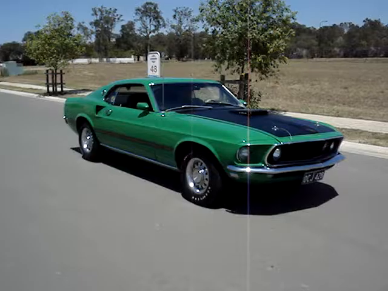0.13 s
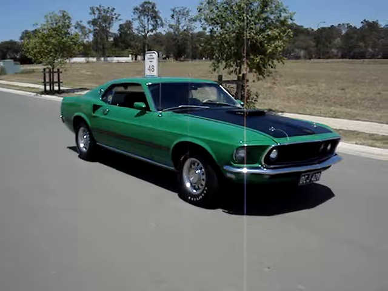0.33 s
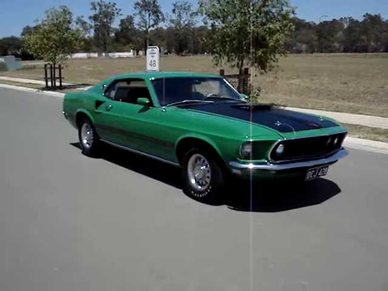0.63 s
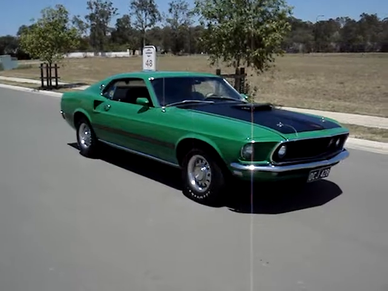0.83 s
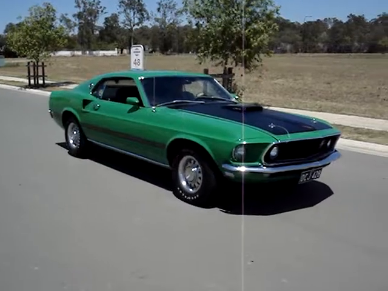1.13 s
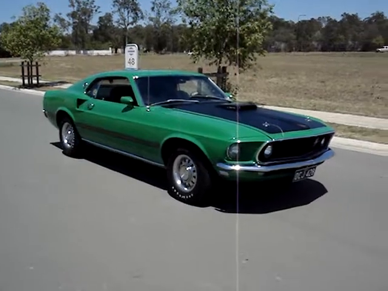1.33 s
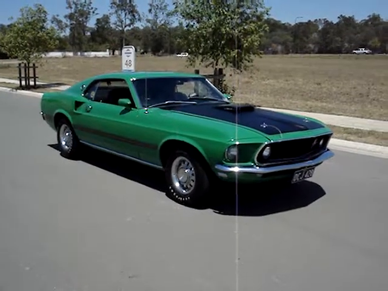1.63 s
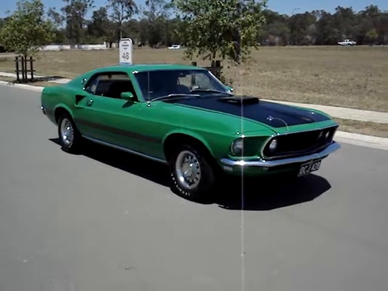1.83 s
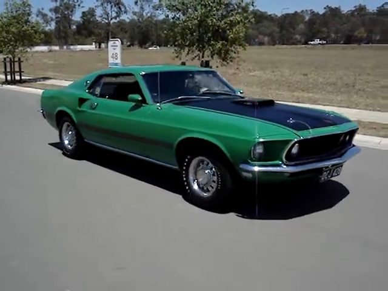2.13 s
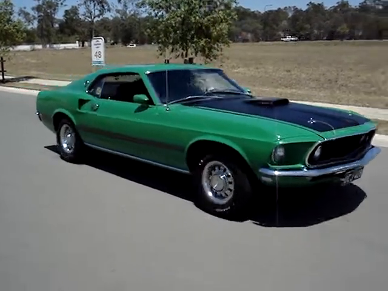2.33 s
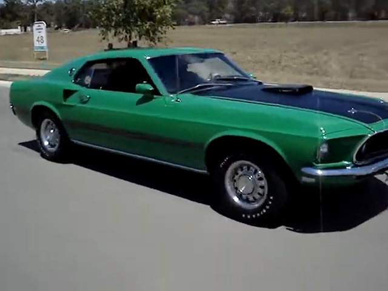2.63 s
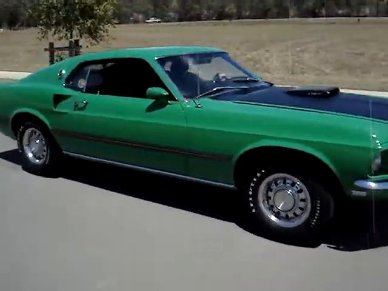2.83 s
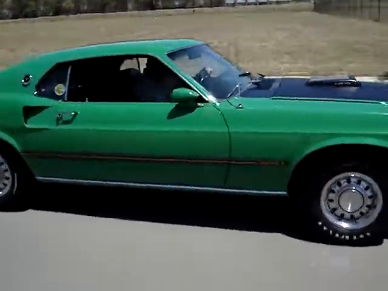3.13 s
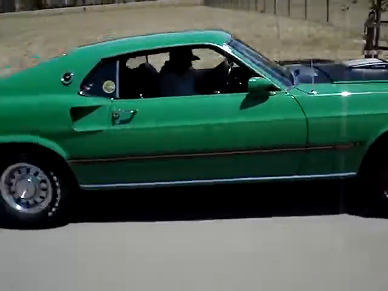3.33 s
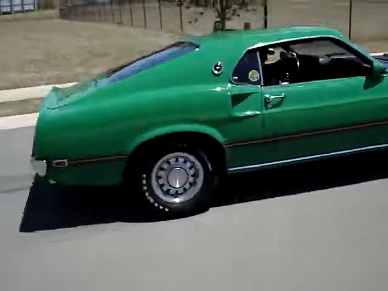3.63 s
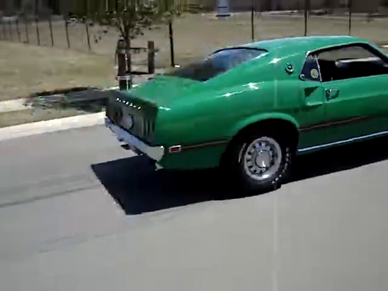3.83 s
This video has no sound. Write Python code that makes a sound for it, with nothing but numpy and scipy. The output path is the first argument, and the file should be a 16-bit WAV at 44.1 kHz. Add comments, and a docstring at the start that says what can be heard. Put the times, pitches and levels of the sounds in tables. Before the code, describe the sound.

Muscle car engine throbs softly outdoors while wind buffets a handheld-type microphone; the throttle opens, then at about two seconds the tyres shriek, turning ragged as the car sweeps past to the end.

```python
"""A V8 muscle car idles on an open road while wind puffs and sharp thumps buffet the microphone.
Revved against the brake, its exhaust pulses, growl and fan rush climb with engine speed.
Then the rear tyres break loose: stick-slip oscillation squeals, first cleanly, then raggedly, over noise
bursts of scrubbing rubber. The scrub changes colour as the car rolls past, with the wheel arch coming last."""
import sys
import numpy as np
from scipy import signal
from scipy.fft import rfft, irfft, next_fast_len
from scipy.io import wavfile
from scipy.ndimage import map_coordinates

SR = 44100
rng = np.random.default_rng(int(sys.argv[2]) if len(sys.argv) > 2 else 0)


def digitize_waveform(pressure):
    """Quantize a signal to 16-bit integers and store it at the path in sys.argv[1].

    Rows of a 2-D input are taken as channels; values are limited to [-1, 1].
    """
    field = np.atleast_2d(pressure).T
    bounded = np.clip(field, -1, 1)
    quanta = np.round(bounded * 32767).astype(np.int16)
    wavfile.write(sys.argv[1], SR, quanta)


N = 176400

# engine speed: time_s, firings_per_s
ENGINE_SPEED = [(.08, 57), (.36, 57.5), (.62, 85), (.92, 85), (1.0, 87), (1.37, 87), (1.5, 99), (1.8, 108),
                (2.0, 133), (2.25, 161), (2.5, 189), (2.7, 213), (2.95, 227), (3.21, 256), (3.5, 281),
                (3.73, 294), (4.0, 286)]
# cylinders in firing order: strength_db, lateness (firing intervals)
CYLINDERS = [(6.5, 0), (6.5, 0.11), (4, -.05), (2.5, 0.12), (6, .02), (0.5, -.06), (4.5, 0.097), (-2, -.04)]
SLIP_S, RAGGED_RISE_S = 1.912, 0.4007  # the tyres let go; the squeal turns ragged over this time


def amp(db):
    """Decibels to gain."""
    return 10 ** (np.asarray(db) / 20)


def unit(x):
    """Scale to rms 1."""
    return x / np.sqrt(np.mean(x ** 2) + 1e-20)


def clock():
    """Time of each sample in seconds."""
    return np.arange(N) / SR


def curves(rows):
    """One value per sample for each column after the time."""
    s, *cols = np.transpose(rows)
    return [np.interp(clock(), s, c) for c in cols]


def ramp(start_s, length_s):
    """Rises in a straight line from 0 to 1."""
    return np.clip((clock() - start_s) / length_s, 0, 1)


def wobble(rate):
    """A smooth random curve of rms 1, with rate knots a second."""
    return unit(map_coordinates(rng.standard_normal(8192), [clock() * rate + 2], mode="mirror"))


def phase_of(hz):
    """Phase in radians of an oscillation whose pitch moves."""
    return 2 * np.pi * np.cumsum(hz) / SR


def coloured(x, points):
    """x through a causal minimum-phase filter with these (freq_hz, gain_db) points."""
    m = 2 * next_fast_len(N)
    f, db = np.transpose(points)
    log_f = np.log(np.fft.rfftfreq(m, 1 / SR) + 1)
    gain_db = np.interp(log_f, np.log(f + 1), db)
    # fold the cepstrum forward so that the filter never rings ahead of its input
    cepstrum = irfft(np.log(amp(gain_db)))
    cepstrum[1:m // 2] *= 2
    cepstrum[m // 2 + 1:] = 0
    return irfft(rfft(x, m) * np.exp(rfft(cepstrum)))[:N]


def noise(points):
    """Coloured noise of rms 1; only the shape of the colour matters."""
    return unit(coloured(rng.standard_normal(N), points))


def throb(pulses, decay_s, depth):
    """Gain of rms 1 that jumps with each pulse and falls back exponentially."""
    bursts = unit(signal.lfilter([1], [1, -np.exp(-1 / (SR * decay_s))], pulses))
    return unit(1 + abs(depth) * bursts)


def firings(scatter_db, jitter):
    """One impulse per firing, uneven from cylinder to cylinder; jitter is in firing intervals."""
    rate, = curves(ENGINE_SPEED)
    count = np.cumsum(rate) / SR
    k = np.arange(1, int(count[-1]))
    strength_db, late = np.array(CYLINDERS)[k % len(CYLINDERS)].T
    chance = rng.standard_normal((len(k), 2))
    at = np.searchsorted(count, k + late + jitter * chance[:, 0])
    at = np.clip(at, 0, N - 1)
    # faster firing gets weaker impulses, to hold the power steady
    strength = amp(strength_db + scatter_db * chance[:, 1]) / np.sqrt(rate[at])
    return np.bincount(at, strength, N)


def boom():
    """Low exhaust boom: the firing tone and its octave, slightly unsteady in level and phase."""
    # time_s, firing_tone_db, octave_db
    boom_levels = [(.08, -44, -47), (.4, -50, -41), (.65, -35.5, -35), (1.35, -37, -33),
                   (1.55, -37.5, -44.5), (1.85, -36.5, -52), (2.1, -31, -56), (2.42, -28, -46),
                   (2.65, -33.5, -61), (2.9, -44, -48), (3.25, -41.5, -36.5), (3.45, -44, -37),
                   (3.7, -37.5, -53), (4, -41, -50)]
    phase = phase_of(curves(ENGINE_SPEED)[0])
    out = np.zeros(N)
    for k, db in enumerate(curves(boom_levels), 1):
        level = amp(db + 1.1 * wobble(14))
        out += level * np.sqrt(2) * np.sin(k * phase + 0.14 * wobble(25))
    return out


def exhaust(pulses):
    """The firing impulses ring through the resonances of the exhaust pipes."""
    # exhaust pulses: time_s, level_db
    exhaust_level = [(.08, -45.5), (.38, -45.5), (.6, -39.5), (1.35, -39), (1.5, -37), (1.85, -32),
                     (2.1, -39.5), (2.6, -45.5), (3.3, -43.5), (4, -50)]
    # pipe resonances: freq_hz, gain_db
    pipe_colour = [(30, -31), (70, -21), (130, -5), (185, 2.5), (250, 1.5), (350, -13.5), (450, -5.5),
                   (540, -2), (700, -2), (900, -13), (1500, -21), (3000, -45), (8000, -75)]
    return amp(curves(exhaust_level)[0]) * unit(coloured(pulses, pipe_colour))


def engine_bay(pulses):
    """Fan rush and intake roar are air noise that throbs with the firings; opening the throttle recolours it."""
    # fan and engine bay rush: time_s, level_db
    fan_level = [(.08, -39.5), (.2, -38.5), (.45, -35.5), (1.36, -34), (1.42, -32), (1.8, -29.5),
                 (2.1, -32), (4, -33.5)]
    # rush at idle: freq_hz, gain_db
    idle_colour = [(240, -27), (400, -7.5), (607, -0.5), (667, -19), (695, -10), (1170, -5), (1340, -12),
                   (1520, -6), (1880, -14.5), (3740, -16), (4960, -21.5), (5760, -20.5), (7740, -27),
                   (9100, -24.5), (10000, -25.5), (13000, -58), (22000, -120)]
    # rush when revved: freq_hz, gain_db
    revved_colour = [(240, -41.5), (400, -23.5), (538, 2.5), (591, -14), (753, -2.5), (885, -11),
                     (1190, -6), (1420, -13.5), (1540, -9), (2340, -17), (3590, -13), (4170, -20.5),
                     (4580, -15), (4960, -19), (10000, -23.5), (13000, -60), (22000, -120)]
    # intake roar: freq_hz, gain_db
    intake_colour = [(100, -29), (180, 1), (250, -1), (350, -19), (450, -5), (540, 3), (640, -5), (780, -5),
                     (1000, -19), (2500, -39.5)]
    opened = ramp(1.35, 0.098)  # the throttle opens
    rush = np.sqrt(1 - opened) * noise(idle_colour) + np.sqrt(opened) * noise(revved_colour)
    fan = amp(curves(fan_level)[0] + .6 * wobble(30.3)) * rush
    # the roar fades once the tyres slip
    intake = amp(-35) * opened * (1 - ramp(SLIP_S, 0.91)) * noise(intake_colour)
    return (fan + intake) * throb(pulses, decay_s=.007, depth=.17)


def engine():
    """The same firings drive the pipes and the rush, with the boom following engine speed."""
    pulses = firings(scatter_db=2.5, jitter=.02)
    return boom() + exhaust(pulses) + engine_bay(pulses)


def growl():
    """Under load the uneven beat of each exhaust bank puts clean partials between the firing tones."""
    # overall gain: time_s, gain_db
    growl_gain = [(1.4, -69), (1.55, -50), (1.95, -40), (2.15, -41), (2.5, -40), (2.9, -39), (3.3, -40),
                  (3.6, -45.5), (4, -44)]
    # partials: multiples of the four-stroke cycle rate
    growl_orders = [4, 6, 7, 10, 11, 13, 14, 16, 18, 20, 22, 24, 25]
    # one relative level_db per partial
    order_levels = [-3, -6, -8.5, -4, -0.5, 4.5, -3.5, 0.5, 2, -1, -4.5, -3, -1.5]
    # resonances the partials sweep through: freq_hz, gain_db
    growl_colour = [(60, -25), (105, -13), (165, 1), (280, -6.5), (345, -10), (400, -10.5), (460, -2.5),
                    (545, 3), (700, -2.5), (1000, 1)]
    cycle_hz = curves(ENGINE_SPEED)[0] / len(CYLINDERS)
    phase = phase_of(cycle_hz)
    hz, colour_db = np.transpose(growl_colour)
    out = np.zeros(N)
    for k, db in zip(growl_orders, order_levels):
        resonance_db = np.interp(np.log(k * cycle_hz), np.log(hz), colour_db)
        level = amp(db + resonance_db + 2 * wobble(12))
        start_phase = 2 * np.pi * rng.random()
        out += level * np.sin(k * phase + start_phase + 0.52 * wobble(22.18))
    return np.sqrt(2) * amp(curves(growl_gain)[0]) * out


def stick_slip(wander_hz, jitter_hz, overtone_spread_hz):
    """One tyre's tread sticks and slips at an audible rate, its pitch and strength growing unsteady."""
    # time_s, pitch_hz
    squeal_pitch = [(1.91, 1074), (1.94, 1022), (1.975, 1066), (2.04, 1020), (2.15, 973), (2.22, 1005),
                    (2.4, 984), (2.48, 993), (2.58, 1003), (2.66, 1012), (2.83, 1028), (3.08, 1016),
                    (3.35, 1024), (3.5, 1033), (3.62, 1030), (3.8, 1037), (4, 1013)]
    # time_s, fundamental_db, overtone_reference_db
    squeal_levels = [(1.92, -14, -27), (1.98, -12.5, -21.5), (2.06, -14.5, -23), (2.09, -16.5, -21.5),
                     (2.24, -13, -24), (2.33, -21, -26), (2.55, -21, -22), (2.67, -17, -25),
                     (2.82, -16.5, -26.5), (3.02, -18, -23.5), (3.16, -21.5, -20.5), (3.5, -20, -20.5),
                     (3.72, -21, -22), (3.85, -22, -24.5), (4, -17, -23.5)]
    # overtones: multiple of the pitch, level_db relative to the overtone reference
    squeal_overtones = [(2, -1), (3, -16.5), (4, -19.5)]
    ragged = 0.2424 + 0.7526 * ramp(SLIP_S, RAGGED_RISE_S)
    unsteady_hz = wander_hz * wobble(45) + jitter_hz * wobble(280)
    phase = phase_of(curves(squeal_pitch)[0] + ragged * unsteady_hz)
    first_db, reference_db = curves(squeal_levels)

    def grip():
        """Fluttering strength of rms 1."""
        flutter = (amp(3.5) - 1) * ragged * (0.83 * wobble(70) + 0.58 * wobble(190))
        return unit(np.abs(1 + flutter))

    overtones = np.zeros(N)
    for k, db in squeal_overtones:
        rasp = phase_of(overtone_spread_hz * wobble(420))
        overtones += amp(db) * grip() * np.sin(round(k) * phase + rasp)
    fundamental = amp(first_db) * grip() * np.sin(phase)
    return np.sqrt(2) * (fundamental + amp(reference_db) * overtones)


def squeal():
    """The near tyre lets go first; the far one joins in and beats against it."""
    near = stick_slip(wander_hz=8.08, jitter_hz=17.84, overtone_spread_hz=53)
    far = stick_slip(wander_hz=24.05, jitter_hz=37.4, overtone_spread_hz=65)
    share = 0.56 * ramp(SLIP_S, RAGGED_RISE_S)
    build = ramp(SLIP_S, 0.0074)
    return build * (near + share * far) / np.sqrt(1 + share ** 2)


def scrub():
    """Rubber tears over asphalt in small uneven noise bursts, its colour turning as the car draws level."""
    # rubber on asphalt: time_s, level_db
    scrub_level = [(1.88, -34), (1.95, -26), (2.04, -26), (2.1, -21.3), (2.14, -25), (2.45, -22),
                   (2.85, -24.5), (3.3, -21), (3.52, -22.5), (3.6, -22.5), (4, -25)]
    # while the car approaches: freq_hz, gain_db
    approach_colour = [(120, -40), (280, -6.5), (380, -17.5), (540, 1.5), (680, -2), (850, -6),
                       (1150, -0.5), (1400, -7.5), (1660, 4), (1830, -0.5), (2150, -5), (2400, -3),
                       (2800, -2), (3200, -9.5), (3900, -6.5), (4400, -12), (5000, -12), (7000, -17.5),
                       (10000, -21)]
    # once it is alongside: freq_hz, gain_db
    alongside_colour = [(120, -39.5), (230, -17.5), (330, -9), (530, -3.5), (640, -1), (760, 0), (900, -5),
                        (1200, .5), (1500, -2.5), (1850, 3), (2300, -4.5), (2750, -7), (3050, -6.5),
                        (3600, -14.5), (4200, -15.5), (5500, -13), (7500, -18), (10000, -20)]
    # from the rear wheel arch: freq_hz, gain_db
    arch_colour = [(300, -27), (800, -15), (1250, 14), (1600, 4.5), (3100, 1.5), (5000, -4.5), (6400, -4.5),
                   (10000, -16)]
    tears_per_s = 420  # average of a random scatter
    tears = 1. * (rng.random(N) < tears_per_s / SR)
    alongside = ramp(2.78, .45)
    rubber = np.sqrt(1 - alongside) * noise(approach_colour) + np.sqrt(alongside) * noise(alongside_colour)
    tread = amp(curves(scrub_level)[0]) * ramp(SLIP_S - .025, 0.018) * rubber
    arch = amp(-23) * ramp(3.52, 0.031) * noise(arch_colour)
    tearing = throb(tears, decay_s=.0025, depth=.36)
    return (tread + arch) * tearing * amp(0.55 * wobble(40))


def puffs():
    """Wind turbulence at the microphone: lumpy low noise under bell-shaped gusts."""
    # centre_s, half_width_s (to 1/e of the peak), level_db at the peak
    gusts = [(.14, 0.043, -33), (.45, 0.044, -32), (.54, 0.057, -25), (.595, 0.065, -23.5),
             (.76, 0.028, -32), (.89, 0.057, -30), (1.065, 0.029, -25.5), (1.87, 0.032, -33),
             (1.97, 0.049, -24.5)]
    # freq_hz, gain_db
    puff_colour = [(25, -31), (70, -7), (140, 3.5), (290, 1), (450, -5), (750, -9), (1200, -23),
                   (3000, -41)]
    t = clock()
    power = sum(amp(db) ** 2 * np.exp(-2 * ((t - s) / width) ** 2) for s, width, db in gusts)
    return np.sqrt(power) * unit(noise(puff_colour) * amp(2.8 * wobble(130)))


def thumps():
    """Sharp pressure pushes on the microphone: one deep dip between two smaller swells."""
    # centre_s, peak_db, half_width_s (to the zero crossing)
    pushes = [(0.1375, -22, 0.00097), (.533, -12, 0.00041), (0.5516, -14, 0.00047), (0.5689, -11, 0.00054),
              (.596, -8.5, 0.00077), (0.6089, -15, 0.00022), (0.637, -13, 0.00084), (2.111, -17, 0.0012),
              (2.19, -31, 0.0021), (2.39, -36, 0.0016), (2.479, -37, 0.0013)]
    out = np.zeros(N)
    for s, db, width in pushes:
        u = (clock() - s) / width
        out += amp(db) * (u ** 2 - 1) * np.exp(-u ** 2 / 2)
    return out


def rumble():
    """Low rumble of the idling engine, noise weighted to the bass."""
    # time_s, level_db
    rumble_level = [(.08, -39.5), (.5, -36.5), (1.3, -46), (1.42, -34), (1.55, -48), (1.86, -46),
                    (1.96, -43), (2.05, -44), (2.6, -56), (4, -55)]
    # freq_hz, gain_db
    rumble_colour = [(20, -6.5), (45, -4.5), (110, -3), (240, -6), (400, -17), (800, -42.5)]
    return amp(curves(rumble_level)[0]) * noise(rumble_colour)


def scene():
    """Car, wind and the engine's low rumble at one microphone in the open."""
    car = engine() + growl() + squeal() + scrub()
    low_sounds = puffs() + thumps() + rumble()
    return (car + low_sounds)[None]


def record(dry):
    """The microphone comes on, peaks are rounded off and everything above the band limit is removed."""
    start_s, ceiling, top_hz = 0.0782, .7, 10150
    x = dry * ramp(start_s, .003)
    x = x / (1 + np.abs(x / ceiling) ** 4) ** (1 / 4)
    m = 2 * next_fast_len(N)
    # the treble gain falls to nothing over the last 150 Hz
    band = np.clip((top_hz - np.fft.rfftfreq(m, 1 / SR)) / 150, 0, 1)
    return irfft(rfft(x, m) * band, m)[..., :N]


dry = scene()
out = record(dry)
digitize_waveform(out)
```